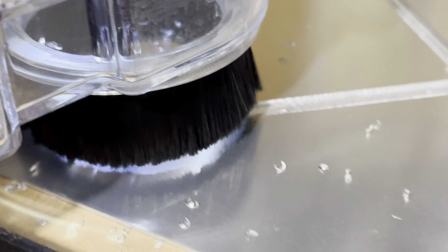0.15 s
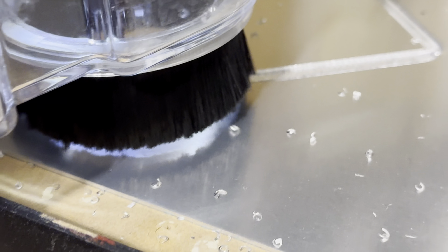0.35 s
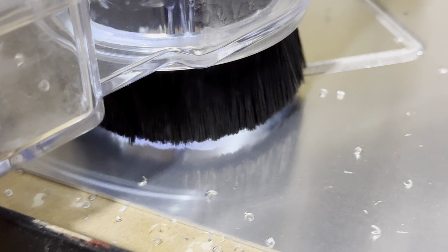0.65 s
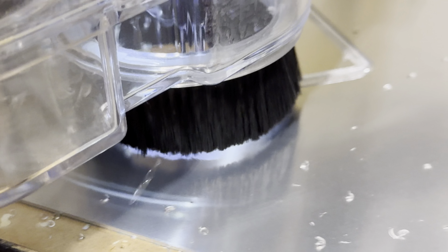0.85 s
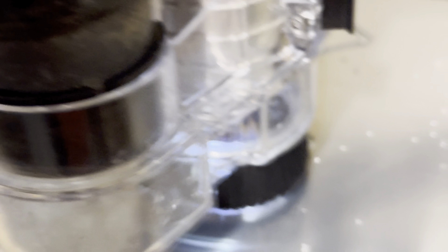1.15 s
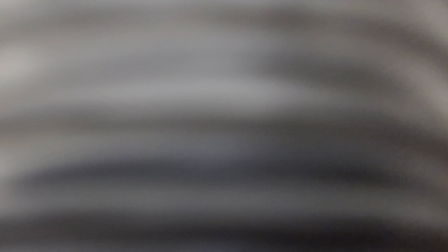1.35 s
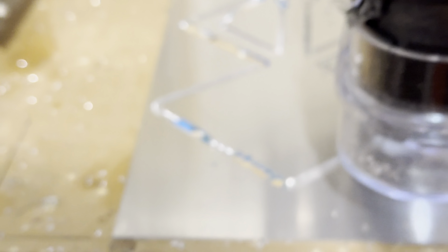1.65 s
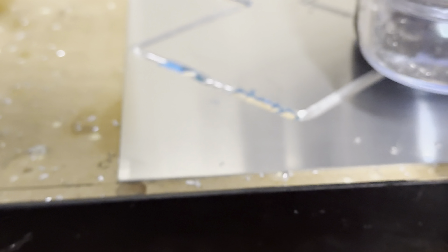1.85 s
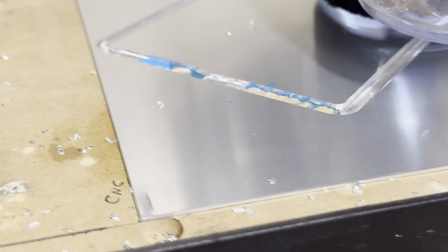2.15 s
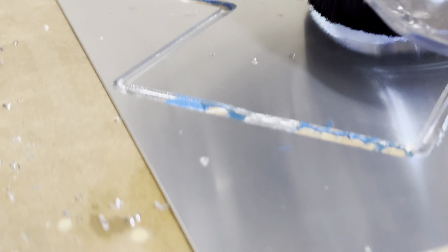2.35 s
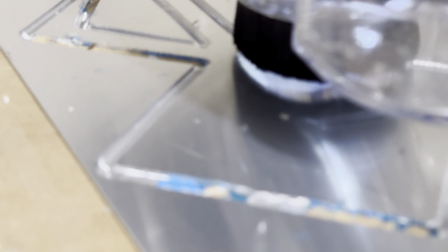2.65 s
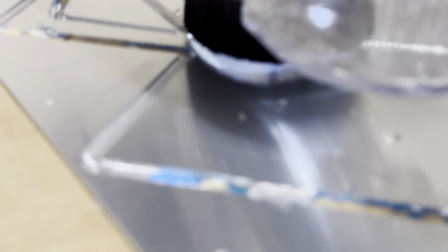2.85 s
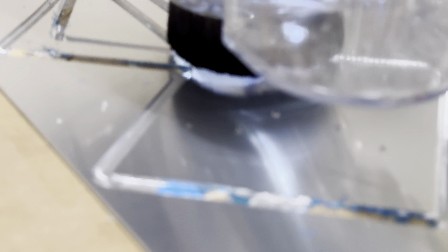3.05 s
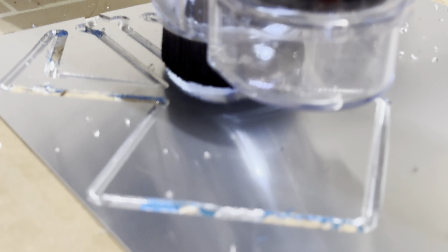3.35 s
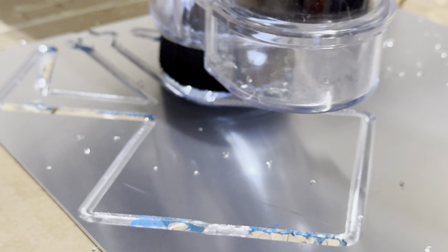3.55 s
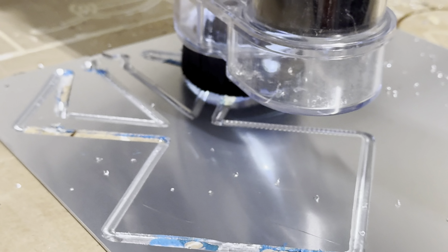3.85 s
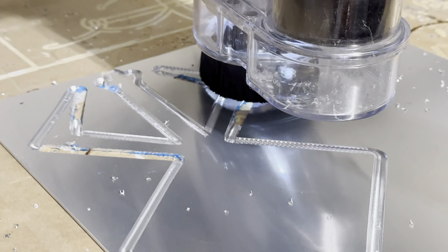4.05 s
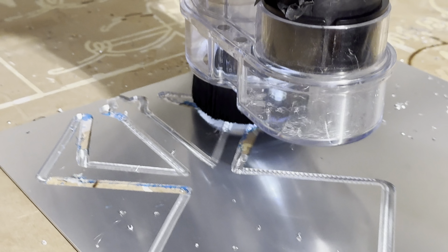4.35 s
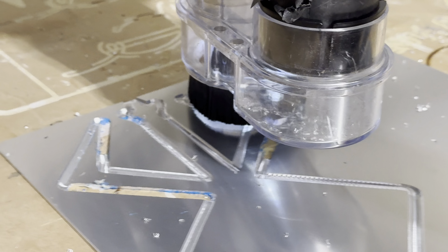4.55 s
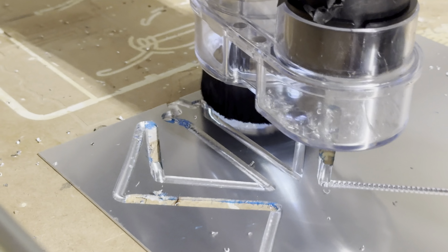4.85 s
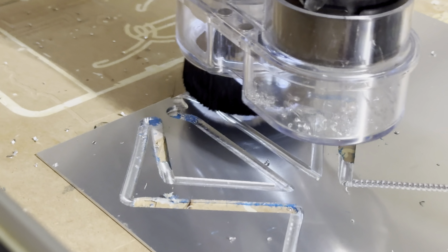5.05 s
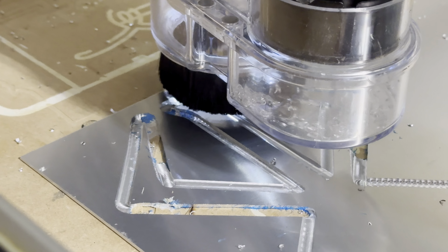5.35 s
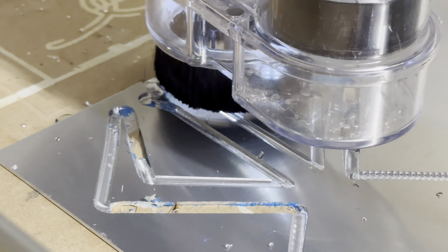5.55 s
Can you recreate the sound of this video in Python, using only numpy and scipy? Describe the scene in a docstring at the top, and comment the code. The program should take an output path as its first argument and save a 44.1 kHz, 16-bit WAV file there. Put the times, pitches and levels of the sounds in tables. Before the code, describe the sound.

Close by in a workshop, a milling cutter whines, squeals and rasps through sheet metal, shuddering twice while an extractor drones underneath.

```python
"""A CNC router's two-flute cutter whines through an aluminium sheet, close by in a workshop. It turns about
350 times a second and sags under load; single harmonics squeal as the sheet resonates. Chips scrape off
on every turn, and twice the cutter shudders in the slot. Stroke by stroke it bites and eases off in the
corners, while the microphone moves around the dust hose. A dust extractor drones underneath."""
import sys
import numpy as np
from scipy import signal
from scipy.fft import rfft, irfft, next_fast_len
from scipy.io import wavfile
from scipy.ndimage import uniform_filter1d

SR = 44100
rng = np.random.default_rng(int(sys.argv[2]) if len(sys.argv) > 2 else 0)


def persist_wave(psi):
    """Save psi, clipped to +-1, as 16-bit WAV."""
    counts = np.round(np.clip(psi, -1, 1) * 32767).astype(np.int16)
    wavfile.write(sys.argv[1], SR, np.atleast_2d(counts).T)


N = 251811
PADDED = next_fast_len(N)
TIME, FREQ = np.arange(N) / SR, np.fft.rfftfreq(PADDED, 1 / SR)


def whine(hz, turns, swing, force, cut, wander_db=1.22, flutter_db=1.2, jitter_rad=0.014, bend_rad=0.23):
    """The cutter sings in harmonics of the spindle, each with its own way through the sheet."""
    # The tone colour of the whine. Each row: frequency in Hz, gain in dB.
    whine_colour = [(1050, -2), (1750, 0), (2100, -1), (2450, 0), (2800, 0.5), (3500, -3.5), (4200, 1),
                    (6000, -2.5), (8500, -3.5), (11000, -3), (15000, -16)]
    # the flutes meet the metal a little early or late, which blurs the high harmonics
    angle = 2 * np.pi * (turns % 1) + jitter_rad * walk(110)
    out = 0
    for order in range(1, 31):
        lag, phase = rng.standard_normal(), rng.uniform(0, 2 * np.pi)
        if order == 1:
            db = cut["hum"]
        elif order == 2:
            db = cut["flute"] + 2.5 * np.abs(swing)  # a shudder lifts the flute tone
        else:
            # the sheet's response changes as the cutter travels over it, most for the short waves
            wander = wander_db * np.sqrt(min(order / 2, 10)) * walk(7.4)
            harmonic_hz = order * hz.mean()
            colour = spectrum(whine_colour, harmonic_hz) + cut["ring"] * sheet_resonance(harmonic_hz)
            db = cut["whine" if order <= 10 else "shrill"] + colour + wander
        gain = squeal_gain(order, db) * undb(flutter_db * walk(25.6))
        # a slight shudder chops and bends each harmonic at its own moment; a hard one pulls them in step
        own_swing = swing * np.exp(1j * ((1.6 - 1.3 * force) * lag - 1.8 / order))
        depth = .58 * (order > 2) * (1 - force) + .7 * force
        bend = bend_rad * np.sqrt(order) * (own_swing * np.exp(1j * phase)).imag
        out = out + np.sqrt(2) * gain * throb(own_swing, depth) * np.sin(order * angle + phase + bend)
    return out


def sheet_resonance(hz):
    """How close a frequency lies to a ringing mode of the sheet, from 0 to 1."""
    # The sheet's two main modes. Each row: frequency in Hz, width in Hz.
    modes = [(1410, 85), (2480, 130)]
    return sum(np.exp(-((hz - mode_hz) / width_hz) ** 2) for mode_hz, width_hz in modes)


def squeal_gain(order, db, drain_db=-5, fade_s=0.012):
    """Gain of one harmonic: it squeals when it locks onto a resonance, and dips when a neighbour does."""
    # The squeals. Each row: start and end in seconds, multiple of the spindle speed, level in dB.
    squeals = [(0.0, 0.27, 7, -29.5), (0.0, 0.267, 18, -32.5), (0.435, 1.128, 7, -30),
               (0.44, 0.84, 11, -31), (0.444, 0.967, 5, -30), (0.53, 0.78, 20, -33),
               (0.778, 1.179, 18, -34.5), (0.887, 1.064, 25, -31.5), (0.894, 1.198, 8, -33),
               (0.963, 1.85, 3, -34.5), (0.974, 1.614, 4, -35), (1.0, 1.19, 11, -33),
               (1.405, 2.969, 7, -37.5), (1.95, 2.92, 9, -36), (1.957, 2.902, 10, -36.5),
               (3.27, 3.87, 7, -34), (3.272, 3.87, 8, -35), (3.323, 3.6, 6, -33.5),
               (4.346, 4.814, 3, -36.5), (4.375, 4.616, 10, -37), (4.38, 4.62, 14, -35.5),
               (4.734, 5.059, 13, -38)]
    gain = undb(db)
    for start, end, multiple, _ in squeals:
        if order > 2 and abs(multiple - order) == 1:
            during = slice(int(start * SR), int(end * SR))
            gain[during] = undb(db[during] + drain_db)
    for start, end, multiple, squeal_db in squeals:
        if multiple == order:
            gain[int(start * SR):int(end * SR)] = undb(squeal_db)
    return uniform_filter1d(gain, size=int(fade_s * SR))


def tool_path(bite_s=0.02, release_s=0.06, flute_share=0.65):
    """Fader curves in dB for the layers of the cut: each stroke bites, holds and eases into a corner."""
    # The straight strokes. Each row: start and end in seconds, then base levels in dB for once-a-turn
    # hum, flute tone, each whine harmonic, each shrill harmonic, boost at the sheet's modes, hiss, rasp.
    strokes = [(-0.1, 0.294, -32, -32.5, -34.5, -37.5, 6.5, -26.5, -28.5),
               (0.44, 1.828, -32, -32, -33, -37.5, -2, -25, -28.5),
               (1.889, 3.004, -39.5, -32.5, -36, -43, 4, -25.5, -26.5),
               (3.056, 3.207, -38.5, -26, -34, -40, 2.5, -27, -27.5),
               (3.248, 3.86, -40.5, -27.5, -34.5, -41.5, 8, -25.5, -26),
               (3.91, 4.18, -40, -31.5, -37.5, -43, -5.5, -29.5, -29),
               (4.318, 5.152, -33.5, -31.5, -35, -40.5, 3, -26.5, -27.5),
               (5.382, 5.594, -43.4, -27, -37.5, -42, 4, -29, -28),
               (5.638, 5.8, -46, -31, -35, -38.5, -2, -29.5, -28)]
    # The cutter eases off between strokes. One row: the same seven levels in dB, from hum to rasp.
    corner = (-42, -31, -41, -46.5, 7.5, -30.5, -27)
    # The microphone moves away, behind the dust hose and back. Each row: time in seconds, gain in dB.
    nearness = [(0, -2.5), (1.0, -1), (1.18, -5), (1.35, -10), (1.65, -9.5), (2.0, -6), (2.8, -1.5),
                (3.4, -5), (4.0, -6), (4.6, -3.5), (5.2, -8), (5.71, -8.5)]
    engaged = np.array([np.clip(np.minimum((TIME - start) / bite_s, (end - TIME) / release_s) + .5, 0, 1)
                        for start, end, *_ in strokes])
    corner_db, stroke_db = np.array(corner)[:, None], np.array(strokes).T[2:]
    hum, flute, tones, shrill, ring, hiss, rasp = corner_db + (stroke_db - corner_db) @ engaged
    near = curve(nearness)
    # the whole machine radiates the flute tone, so it follows only a share of the microphone's move
    return dict(hum=hum + near, flute=flute + flute_share * near, whine=tones + near,
                shrill=shrill + near, ring=ring, hiss=hiss + near, rasp=rasp + near)


def shudder():
    """The cutter's swing as a rotating vector, and how hard it digs in (0-1); a hard shudder is slower."""
    # The cutter shudders in the slot. Each row: start, hardest moment and end in seconds,
    # rate at its hardest in Hz, extra rate when slight in Hz.
    shudders = [(1.898, 2.877, 3.06, 28.4, 8.4), (4.724, 5.081, 5.32, 28.46, 1.98)]
    swing, force = 0, 0
    for start, hardest, end, rate_hz, extra_hz in shudders:
        ramp = np.interp(TIME, [start, hardest, end], [0, 1, 0])
        cycles = np.cumsum(rate_hz + extra_hz * (1 - ramp) ** 4) / SR
        cycles -= np.interp(hardest, TIME, cycles)  # a crest lands on the hardest moment
        swing = swing + np.minimum(ramp / .27, 1) * np.exp(2j * np.pi * cycles)
        force = force + ramp ** 2
    return swing, force


def throb(swing, depth):
    """Tremolo of a swinging bite: broad tops, narrow dips, and the same mean power."""
    depth = np.clip(depth, 0, 1)
    return (1 + depth * swing.real) / np.sqrt(1 + (depth * np.abs(swing)) ** 2 / 2)


def chips(turns, force, cut, turn_db=2.8, flute_db=2.7, chip_db=1.0, hiss_trim_db=-1, rasp_trim_db=-7.5):
    """Each turn tears off a chip of its own size: a puff of hiss, and a rasp the ringing sheet evens out."""
    # The colours of the chip hiss and the sheet's rasp. Each row: frequency in Hz, relative level in dB.
    hiss_colour = [(1500, -15.5), (3500, -5), (4800, -5.5), (6500, -0.5), (8400, -0.5), (9700, -3.5),
                   (11500, -2.5), (13000, -4.5), (15700, -6.5)]
    rasp_colour = [(100, -38), (250, -25), (500, -6.5), (900, -2.5), (1700, -2.5), (2500, 1.5),
                   (3300, -5.5), (4200, -2), (5500, -10.5), (9000, -51)]
    # a shudder pushes up the hiss, and the rasp even more
    hiss_gain = undb(cut["hiss"] + 3.5 * force)
    rasp_gain = np.hypot(undb(cut["rasp"] + 8.5 * force), scrapes())
    size = rng.standard_normal(4096)[turns.astype(int)]
    bite = undb(turn_db * np.cos(2 * np.pi * turns) + flute_db * np.cos(4 * np.pi * turns) + chip_db * size)
    bite /= np.sqrt(np.mean(bite ** 2))
    hiss = noise(hiss_colour, drift_db=.9, drift_rate=14) * undb(hiss_trim_db + .6 * walk(24)) * bite
    rasp = noise(rasp_colour, drift_db=1.3, drift_rate=10) * undb(rasp_trim_db) * bite ** .3
    return hiss * hiss_gain + rasp * rasp_gain + sizzle() * bite


def scrapes(half_length_s=0.034):
    """Envelope of the extra rasp where the cutter catches and scrapes the sheet."""
    # The catches. Each row: time in seconds, peak gain in dB.
    catches = [(0.35, -45), (1.81, -29), (2.93, -23.5), (3.39, -22), (3.88, -24.5), (4.13, -28.5),
               (4.46, -27), (5.63, -31)]
    return sum(undb(db) * np.exp(-((TIME - at) / half_length_s) ** 2) for at, db in catches)


def sizzle():
    """The hiss sharpens into short, narrow, bright swells."""
    # The swells. Each row: peak time and half-length in seconds, centre and half-width in Hz, level in dB.
    swells = [(1.69, 0.11, 7880, 3000, -45), (2.746, 0.3, 7700, 900, -31), (2.97, 0.045, 8464, 900, -29),
              (3.77, 0.031, 12900, 2510, -28), (4.862, 0.46, 10400, 1188, -34),
              (5.573, 0.07, 11000, 2507, -29)]
    out, white = 0, rfft(rng.standard_normal(PADDED))
    for at, half_length_s, centre_hz, half_width_hz, db in swells:
        band = irfft(white * np.exp(-2 * ((FREQ - centre_hz) / half_width_hz) ** 2), PADDED)[:N]
        envelope = undb(db) * np.exp(-2 * ((TIME - at) / half_length_s) ** 2)
        out = out + band / band.std() * envelope
    return out


def extractor(air_db=-48):
    """The dust extractor: rushing air over the wavering drone of its suction fan."""
    # The tones of motor and fan. Each row: frequency in Hz, level in dB.
    tones = [(118.4, -64.5), (172.3, -59), (242.2, -59.5), (320.5, -68), (374.5, -58)]
    # The colour of the rushing air. Each row: frequency in Hz, relative level in dB.
    air_colour = [(25, -28), (42, -37), (60, -4), (100, -14.5), (160, 4.5), (205, -0.5), (260, 3),
                  (420, 4.5), (560, 6.5), (850, -11.5), (2000, -15.5), (8000, -61)]
    drone = sum(undb(db + 2 * walk(7.2)) * np.sin(2 * np.pi * hz * TIME + 0.52 * walk(2.2))
                for hz, db in tones)
    air = undb(air_db + 0.23 * walk(17.0)) * noise(air_colour)
    return air + np.sqrt(2) * drone


def workshop(x, t60_s=0.22, low_hz=150, damp_hz=4000):
    """A short, dull wash of reflections from the machine bed and the walls."""
    t = TIME[:SR // 2]
    tail = rng.standard_normal(len(t)) * np.exp(-np.log(1000) * t / t60_s)
    walls = signal.butter(2, [low_hz, damp_hz], "band", fs=SR, output="sos")
    return signal.fftconvolve(x, signal.sosfilt(walls, tail / np.linalg.norm(tail)))[:N]


def noise(colour, drift_db=0., drift_rate=6.):
    """Coloured noise at rms 1, in six bands that can each swell and fade on their own."""
    coloured = rfft(rng.standard_normal(PADDED)) * undb(spectrum(colour, FREQ))
    band = np.clip(np.log2((FREQ + 1) / 375), 0, 5).astype(int)  # splits at octaves from 750 Hz up
    x = sum(irfft(coloured * (band == b), PADDED)[:N] * undb(drift_db * walk(drift_rate)) for b in range(6))
    return x / x.std()


def walk(rate):
    """A smooth random wobble that changes about rate times a second, with a spread of 1."""
    smoothing = np.exp(-(np.arange(2049) * SR / N / rate) ** 2)
    x = irfft(rfft(rng.standard_normal(4096)) * smoothing)
    return np.interp(TIME, np.linspace(0, TIME[-1], len(x)), x / x.std())


def spectrum(points, hz):
    """An EQ curve in dB through (Hz, dB) points, on a log-frequency axis."""
    point_hz, db = np.transpose(points)
    return np.interp(np.log(hz + 1), np.log(point_hz), db)


def curve(points):
    """An automation curve: straight lines through (seconds, value) points."""
    return np.interp(TIME, *np.transpose(points))


def undb(db):
    """Decibels to gain."""
    return np.exp(np.asarray(db) * (np.log(10) / 20))


def scene(room_db=-14, chip_throb=0.38):
    """The cut sits in the middle; reflections arrive from the sides."""
    # The spindle sags under load and recovers. Each row: time in seconds, speed in turns per second.
    spindle_speed = [(0.0, 349.2), (0.42, 354.3), (0.5, 342), (0.58, 339.4), (1.07, 346), (1.8, 350.8),
                     (1.88, 356.4), (2.08, 350.3), (2.94, 349.6), (3.05, 359.6), (3.17, 353), (3.78, 353.3),
                     (4.04, 345.7), (4.29, 350), (4.49, 340.6), (4.82, 350.3), (5.08, 349.8), (5.34, 360),
                     (5.6, 351.7), (5.71, 356.6)]
    hz = curve(spindle_speed)
    turns = np.cumsum(hz) / SR
    swing, force = shudder()
    cut = tool_path()
    tones = whine(hz, turns, swing, force, cut)
    scraping = chips(turns, force, cut) * throb(swing, chip_throb * force)
    machine = tones + scraping + extractor()
    side = undb(room_db) * workshop(machine)
    return np.array([machine + side, machine - side])


def record(dry, rumble_hz=53, top_hz=15750):
    """The microphone leans left in the mids and lags on the left up high; rumble and the very top are cut."""
    # The stereo tilt. Each row: frequency in Hz, level of the left side over the right in dB.
    left_gain = [(200, 0.014), (380, 2.7), (700, 1.8), (1500, 2), (2300, -0.027), (8000, -0.17)]
    # The treble lag. Each row: frequency in Hz, phase of the left side behind the right in turns.
    left_lag = [(8300, 0), (8900, .2), (9500, .5), (10200, .68), (11000, 1), (11450, 1.06), (12550, 1.5),
                (12950, 1.53), (13900, 2), (14350, 2), (15400, 2.5)]
    tilt_db = spectrum(left_gain, FREQ) / 2
    lag = np.exp(-2j * np.pi * np.interp(FREQ, *np.transpose(left_lag)))
    response = np.array([undb(tilt_db) * lag, undb(-tilt_db)])
    stereo = irfft(rfft(dry, PADDED) * response, PADDED)[:, :N]
    stereo = signal.sosfilt(signal.butter(4, rumble_hz, "high", fs=SR, output="sos"), stereo)
    return signal.sosfilt(signal.ellip(10, .2, 80, top_hz, fs=SR, output="sos"), stereo)


dry = scene()
out = record(dry)
persist_wave(out)
```